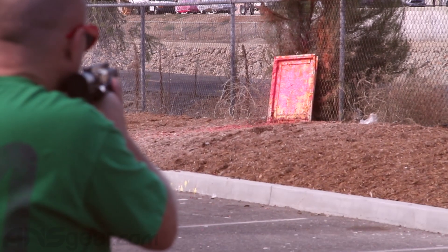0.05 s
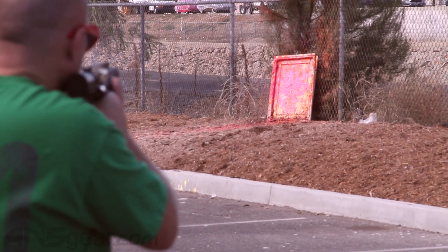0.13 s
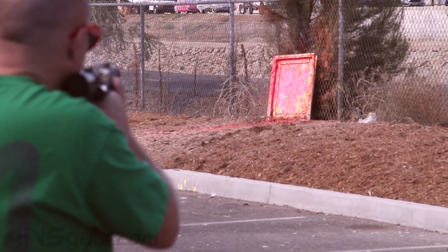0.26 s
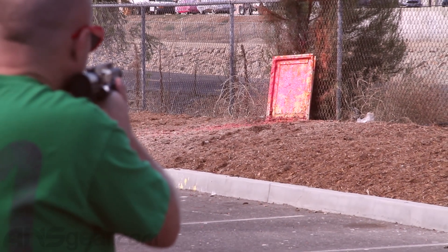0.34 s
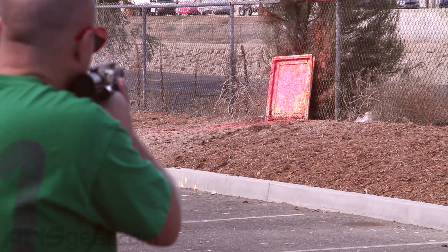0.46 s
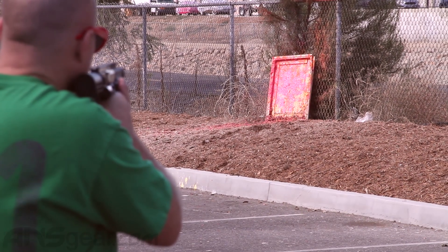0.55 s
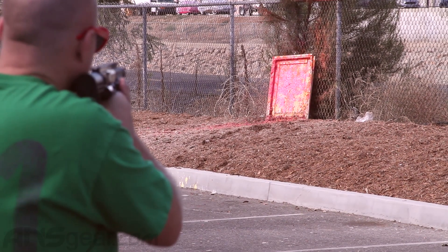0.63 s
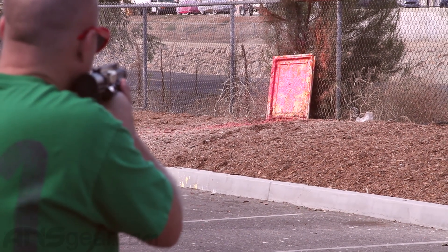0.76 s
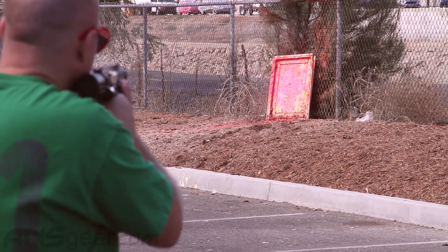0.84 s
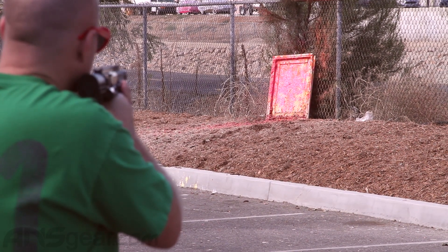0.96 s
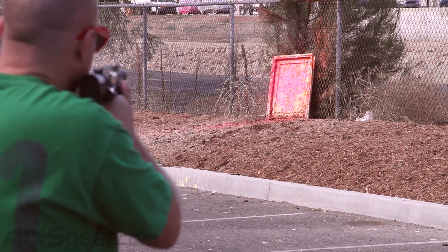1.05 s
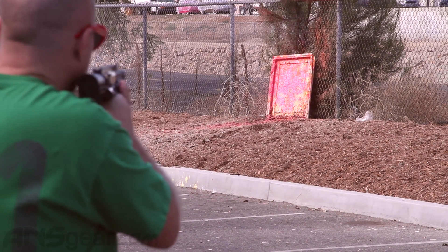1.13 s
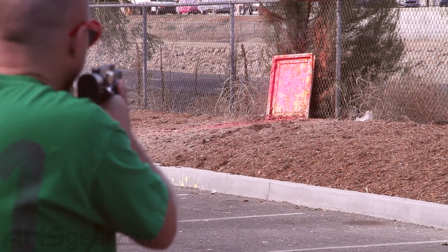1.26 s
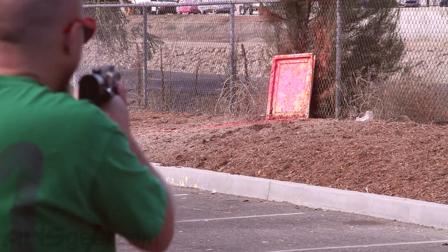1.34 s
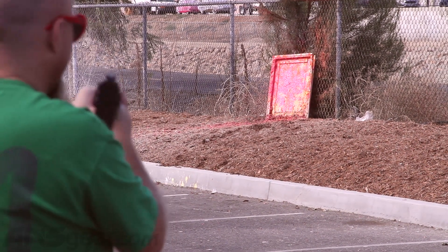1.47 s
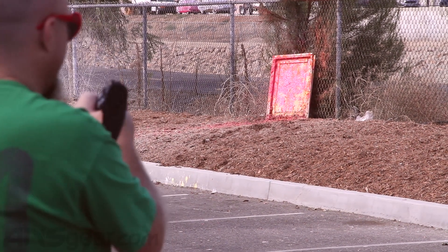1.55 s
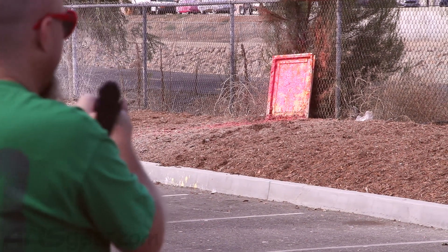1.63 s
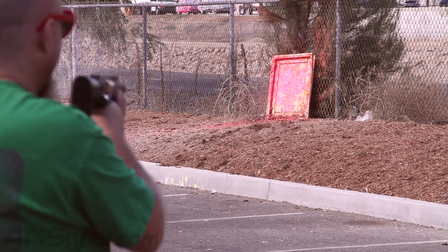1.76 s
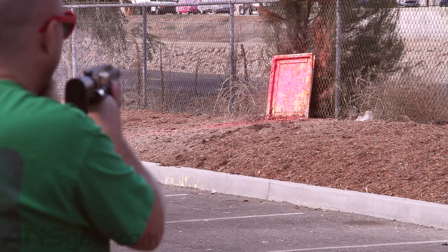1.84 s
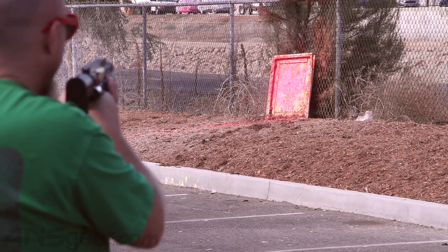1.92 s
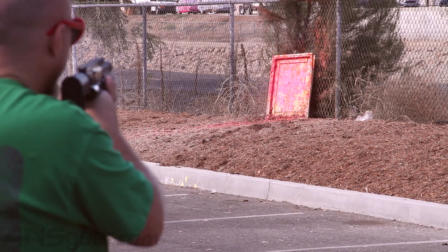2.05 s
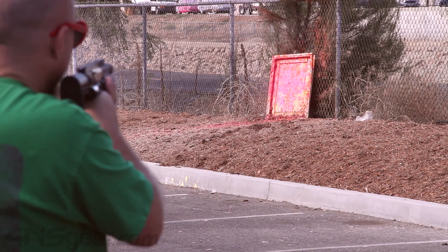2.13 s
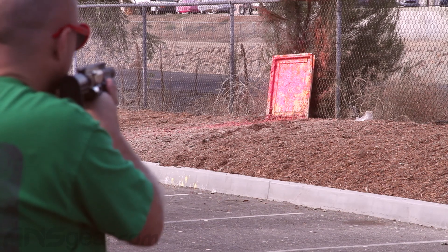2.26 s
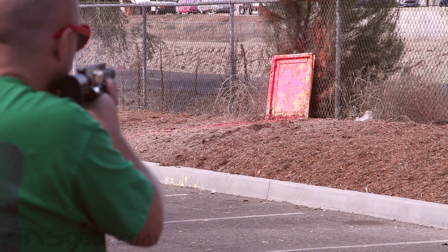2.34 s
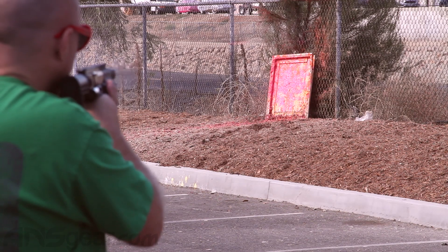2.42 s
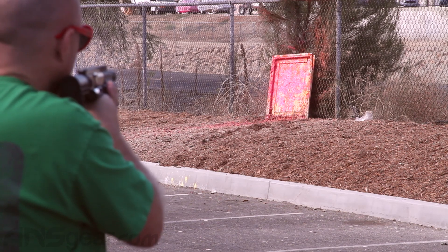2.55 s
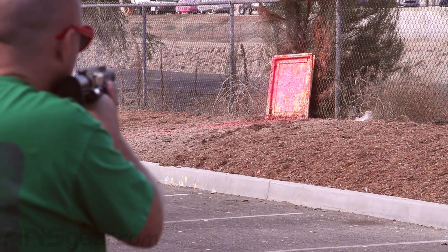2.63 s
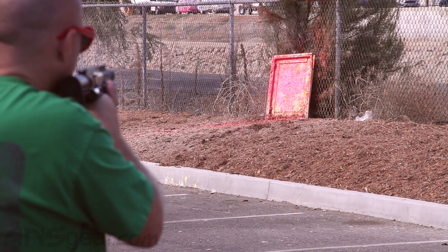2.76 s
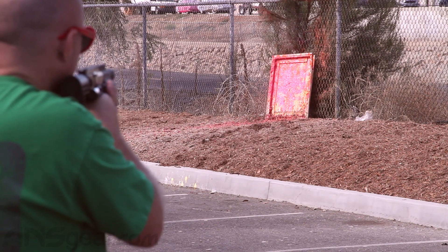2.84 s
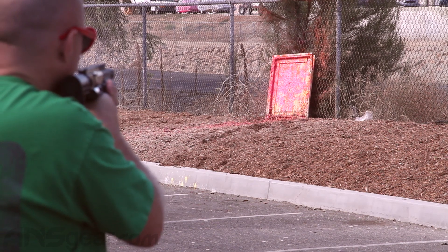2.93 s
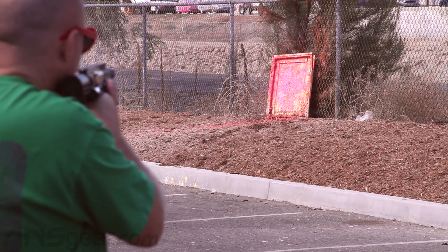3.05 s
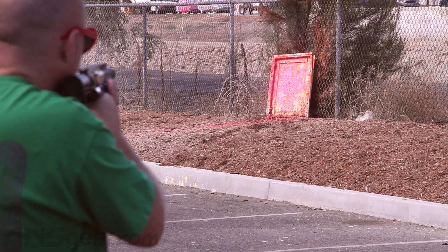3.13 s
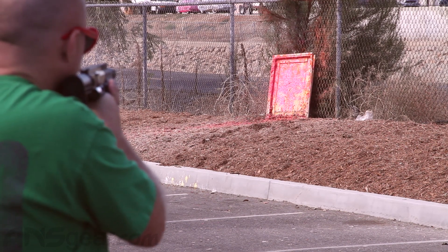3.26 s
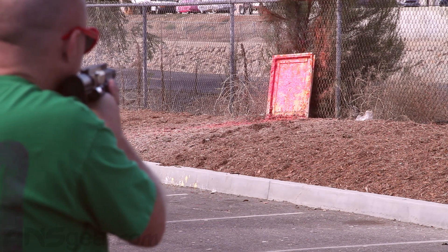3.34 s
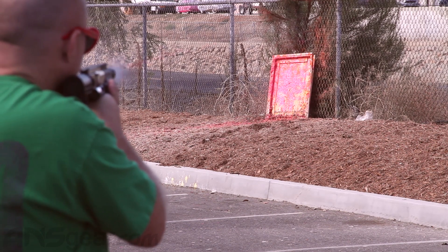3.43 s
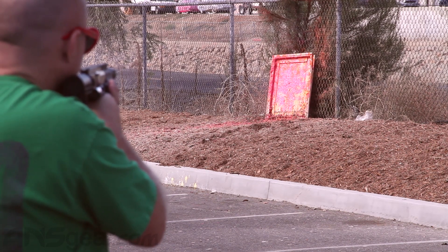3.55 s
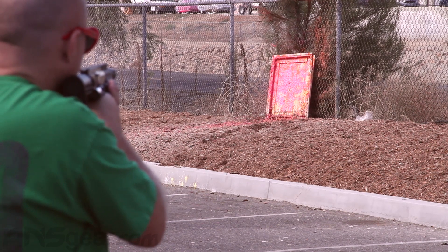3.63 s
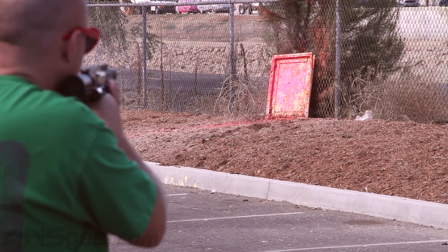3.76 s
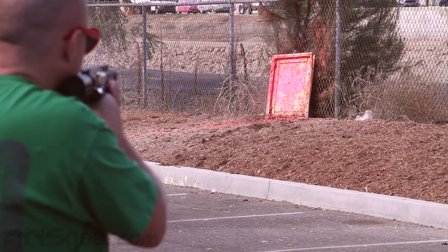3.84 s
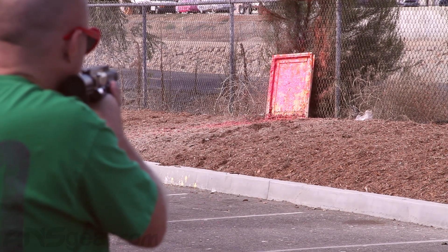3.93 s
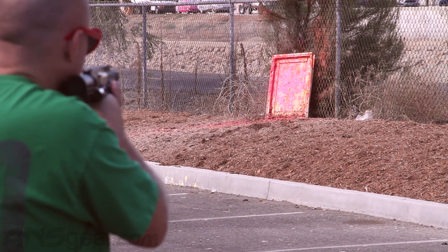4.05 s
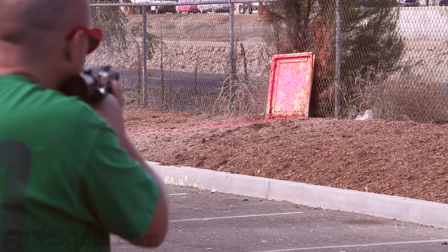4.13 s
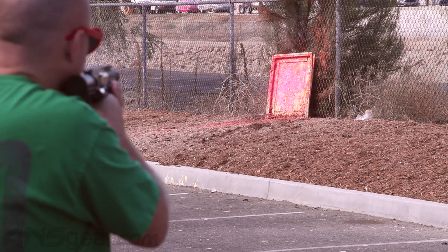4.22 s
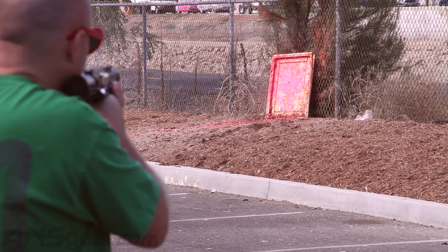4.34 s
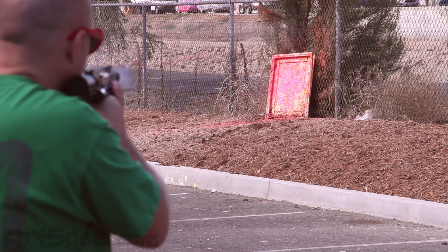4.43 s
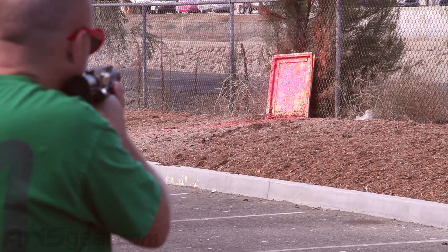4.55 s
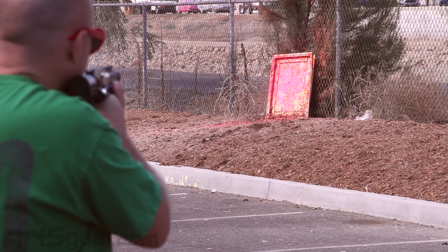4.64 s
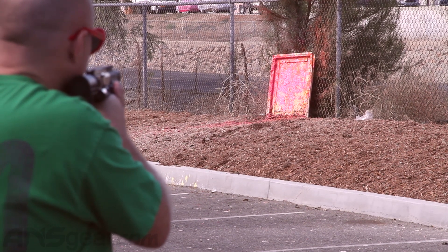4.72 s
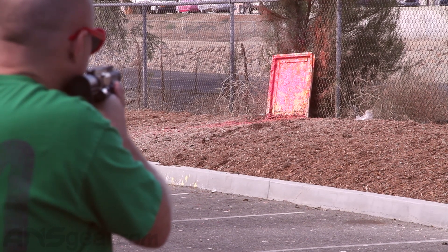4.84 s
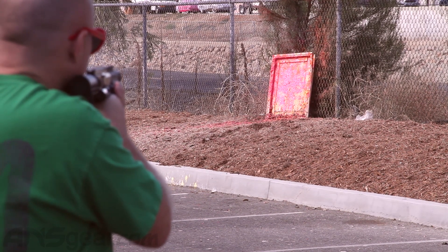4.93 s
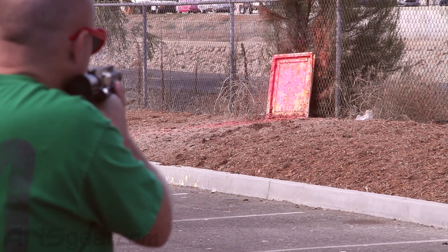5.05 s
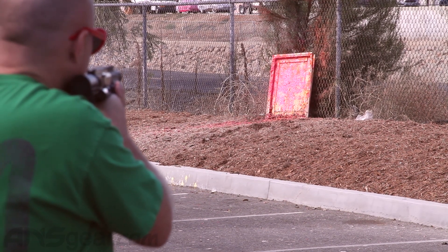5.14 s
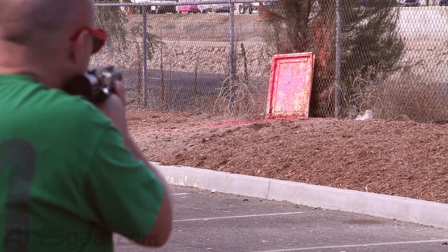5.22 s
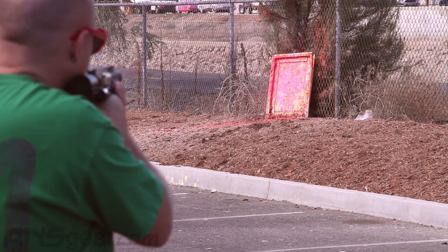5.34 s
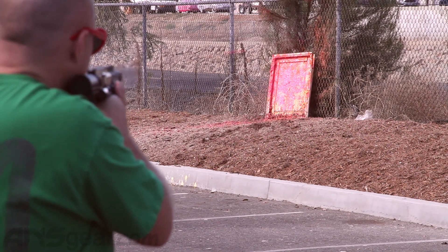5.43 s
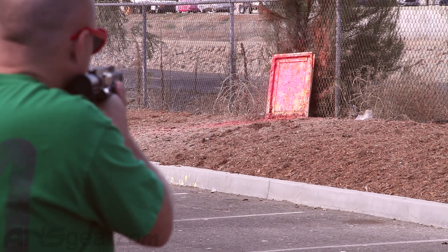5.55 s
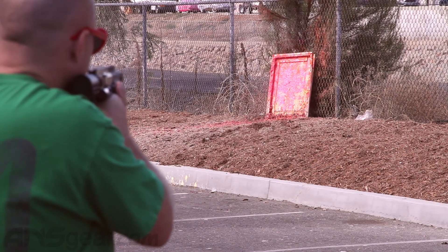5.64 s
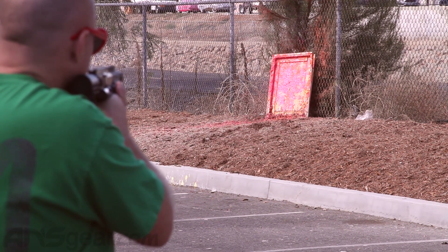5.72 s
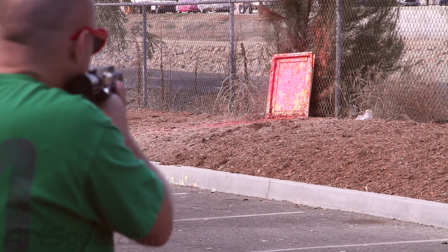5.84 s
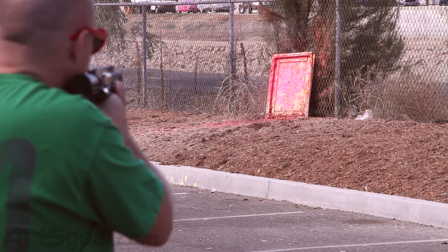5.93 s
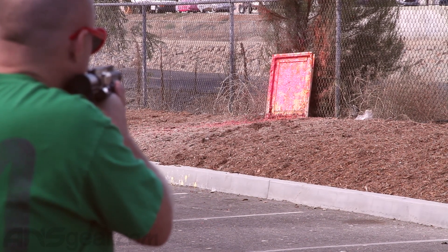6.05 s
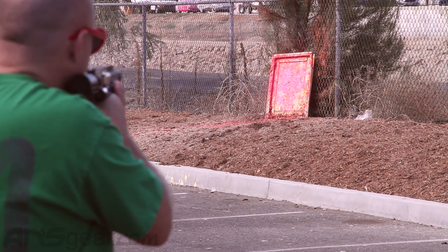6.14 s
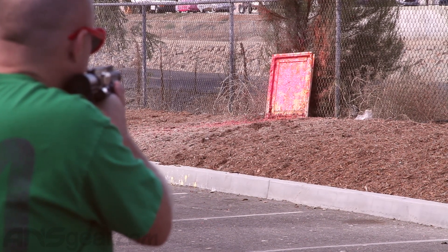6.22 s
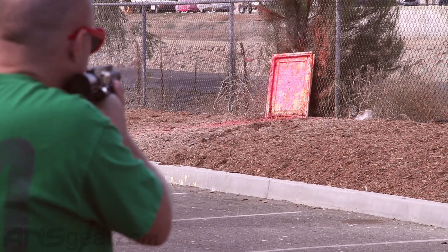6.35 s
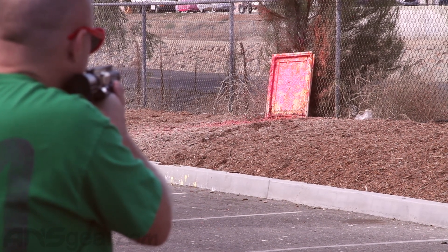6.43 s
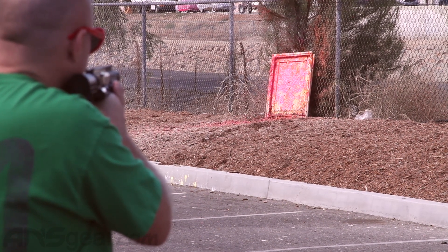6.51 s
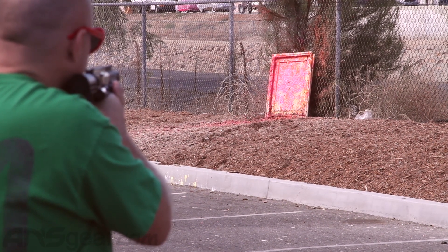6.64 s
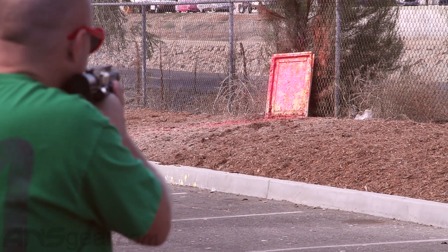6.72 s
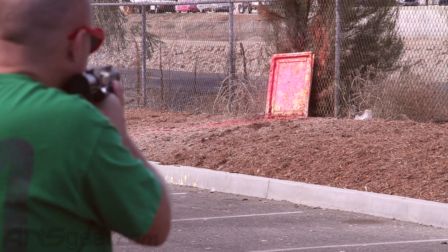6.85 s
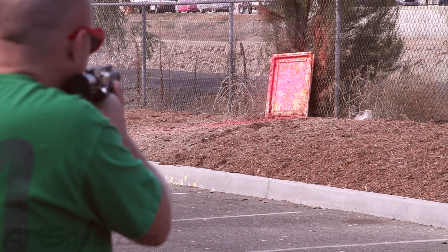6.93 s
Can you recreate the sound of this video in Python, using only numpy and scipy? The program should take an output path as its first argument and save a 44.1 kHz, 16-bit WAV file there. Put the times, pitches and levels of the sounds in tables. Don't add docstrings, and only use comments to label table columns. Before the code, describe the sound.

Very close outdoor pickup of a gas paintball gun. Wind rumbles over faint traffic while small metal clicks and dull taps build to two hard clacks. Then five single shots come about a second apart, overloading the microphone: sharp crack, gas burst, bolt rattle, a softer trigger click, and a small dry splat from a board farther off with short echoes.

```python
import sys
import numpy as np
from scipy import signal
from scipy.fft import rfft, irfft
from scipy.io import wavfile
from scipy.ndimage import uniform_filter1d

SR = 44100
rng = np.random.default_rng(int(sys.argv[2]) if len(sys.argv) > 2 else 0)


def linear_from_db(decibels):
    return 10 ** (np.asarray(decibels, float) / 20)


def generate_wav(signal):
    frames = np.transpose(np.atleast_2d(signal))
    scaled = np.clip(frames, -1, 1) * 32767
    pcm = np.round(scaled).astype(np.int16)
    wavfile.write(sys.argv[1], SR, pcm)


N = 307818

# time in seconds, level in dB.
WIND_STRENGTH = [(0.0, -39.5), (0.68, -42), (0.99, -38.5), (1.46, -40.5), (1.65, -36.5), (2.39, -35.5),
                 (2.55, -36.5), (3.05, -42), (3.6, -37.5), (4.26, -39.5), (4.59, -31.5), (4.9, -37.5),
                 (5.5, -35), (5.89, -36), (6.16, -33), (6.45, -33), (6.9, -37), (6.98, -44)]
# centre in seconds, lift in dB, half length in seconds.
SHORT_GUSTS = [(0.295, 6, 0.031), (2.315, 6.5, .05), (4.081, 4, 0.057), (4.265, 5.5, 0.037),
               (5.11, 2.5, 0.038), (5.528, 4, 0.021), (5.6, 6.5, .03), (5.77, 4, .04), (5.963, 6.5, 0.05),
               (6.046, 4, 0.019), (6.083, 7.5, 0.017), (6.245, 6, 0.012)]
# frequency in Hz, density in dB per Hz.
WIND_SPECTRUM = [(8.8, -24), (15, -1), (76, 1), (129, -6), (258, -18.5), (285, -21), (353, -25.5),
                 (390, -29.5), (450, -29.5), (580, -46.5), (990, -120)]
# frequency in Hz, density in dB per Hz.
BUFFET_SPECTRUM = [(90, -25), (160, 2.5), (300, -6), (520, -13.5), (800, -41.5)]
# time in seconds, level in dB.
TRAFFIC_LEVEL = [(0, -51), (1.3, -49), (1.6, -52), (2.4, -49), (3.7, -51), (4.4, -48.5), (5.2, -48.5),
                 (5.5, -50.5), (6.98, -51.5)]
# frequency in Hz, density in dB per Hz.
TRAFFIC_SPECTRUM = [(180, -31.5), (300, -13), (573, -2.5), (800, -0.5), (1130, 2), (1620, -6),
                    (2290, -18.5), (3770, -27), (4800, -34), (7300, -37.5), (9400, -35.5), (11000, -42.5),
                    (13000, -48), (15800, -47.5), (16500, -72.5)]
# peak in seconds, level in dB, rise and fall over 20 dB, both in seconds.
CLOTH_MOVES = [(.05, -82, .2, 0.22), (.25, -61, 0.23, 0.12), (.87, -72, .3, .06), (1.04, -70, .1, 0.1),
               (1.3, -68, .2, .05), (1.41, -66, .02, .25), (1.49, -43, 0.033, 0.054),
               (1.77, -62, 0.059, 0.06), (1.87, -68, .09, 0.16), (2.1, -76, 0.54, 1),
               (2.82, -67, 0.22, 0.29)]
# frequency in Hz, density in dB per Hz.
CLOTH_SPECTRUM = [(2000, -22.5), (3500, -10.5), (6500, -7), (8000, -3), (9300, 6.5), (10500, 0),
                  (12000, -10), (15700, -14), (17500, -39)]
# time in seconds, pitch in Hz, level in dB.
BIRD_CALL = [
    (4.085, 5400, -120),
    (4.1, 5420, -76),
    (4.116, 5350, -70),
    (4.135, 5050, -62),
    (4.15, 4600, -67),
    (4.17, 4000, -72),
    (4.2, 3450, -77),
    (4.205, 3400, -120),
]
# start in seconds, peak level in dB, pitch in Hz.
DRY_CRACKLES = [(.35, -66, 8800), (2.7253, -57, 9500), (2.7527, -49, 9800), (2.7625, -57, 9600),
                (2.7795, -55, 10000), (2.7961, -60, 10000), (2.8214, -63, 9500), (2.8284, -54, 9900),
                (2.8824, -57, 10300), (2.904, -62, 9900), (2.9567, -52, 10100), (2.9674, -63, 9810),
                (2.9744, -63, 10000), (3.8465, -37.5, 5300), (3.878, -48.5, 5300), (3.913, -56, 9400),
                (4.892, -50, 9800), (4.907, -55, 7500), (4.927, -48.5, 5600), (4.93, -48, 7000),
                (4.934, -48, 5900), (5.85, -56, 9600), (5.87, -59, 6000), (5.889, -55, 5500),
                (6.011, -57, 7800), (6.021, -53, 7170), (6.089, -57.5, 8040), (6.733, -52, 9500),
                (6.774, -56, 5410)]

# start in seconds, treble peak in dB,
# knock and clack in dB over the treble, spray in dB.
BURSTS = [
    (2.8068, -33, -13, -9, -71),
    (3.846, -33.5, -6, -8, -62.5),
    (4.839, -31, 4, 9.5, -49.5),
    (5.7999, -40, 12.5, 3, -54.5),
    (6.684, -35, 8.5, -14, -53),
]
# delay in seconds, treble in dB, knock in dB.
BURST_ECHOES = [
    (0, 0, 0),
    (.014, -18, -24),
    (.025, -28, -17),
    (.0312, -22, -11),
    (.056, -36, -23),
]
# time in seconds, level in dB.
SPRAY_CURVE = [(0, 18.5), (.012, -11), (.04, -1.5), (.075, -1), (.1, -6), (.15, -13), (.22, -18),
               (.3, -27.5)]
# frequency in Hz, density in dB per Hz.
SPRAY_SPECTRUM = [(900, -8), (1800, 9), (4000, -6.5), (6500, -5), (8000, -6), (9300, 5), (10500, -12),
                  (12000, -15), (14000, -23), (16000, -31.5)]
# frequency in Hz, width in Hz, level in dB.
BOARD_MODES = [(580, 170, 10), (373, 170, -10)]
# frequency in Hz, width in Hz, level in dB.
PANEL_MODES = [(2750, 270, -7), (1920, 1000, -6), (5300, 500, -19), (6740, 500, -24)]

# start in seconds, treble peak in dB,
# knock and clack in dB over the treble, T60 in seconds.
HANDLING_CLICKS = [(.0271, -43.5, -3, -12.5, 0.011), (.2449, -44.5, 6.5, 9.5, 0.017),
                   (.498, -39, -0.5, -8, 0.014), (.7299, -41.5, 6.5, 4, 0.03),
                   (.7344, -37.5, -21, 6, 0.0084), (.8493, -37.5, 5.5, -10, 0.022),
                   (.9935, -34.5, 3, 3.5, 0.017), (1.078, -35.5, 6.5, -5, 0.012),
                   (1.0886, -52, 12.5, -7, 0.022), (1.181, -46.5, 6, 5, 0.021),
                   (1.203, -25, -5.5, -5, 0.011), (1.273, -45, 8, -17, 0.01), (1.276, -35, 6, -5, 0.014),
                   (1.2889, -41, 7, -33, 0.0075), (1.3529, -13, -10.5, -9.5, 0.012),
                   (1.3635, -26, -6, 1.5, 0.031), (1.3906, -13.5, -7.5, -12.5, 0.0088),
                   (1.3968, -21, -15, -9, 0.0093), (1.5446, -42, -16, 0, 0.0091)]
# start in seconds, treble peak in dB, clack in dB over it.
GRIP_TAPS = [(.1094, -83, -14), (0.1615, -71, -8), (.176, -73, 18), (0.435, -69, -15), (0.4847, -65, -5),
             (0.5068, -69, -22), (0.692, -65, 19), (0.698, -61.5, 8), (.81, -70, 10), (0.965, -64, 21),
             (0.819, -57.5, -10), (0.8421, -53, 1), (0.969, -53.5, -17), (1.052, -57, -13),
             (1.072, -53, -4), (2.741, -63, -6.5), (3.0268, -60, -16), (3.0607, -65.5, -18.5),
             (4.082, -65.5, -4), (5.3062, -62.5, -6), (6.0262, -63, 0), (6.917, -66, 10)]
# start in seconds, treble peak in dB.
LOOSE_TICKS = [(.0144, -53), (.0654, -59), (.2234, -43.5), (.7173, -43), (.9844, -41), (1.195, -47),
               (1.7862, -54), (2.8744, -54), (3.7984, -50), (4.6349, -47), (6.48, -49.5)]
# start in seconds, treble peak in dB.
FINGER_TOUCHES = [(1.253, -53.5), (4.418, -47), (4.786, -57), (5.3478, -52), (5.368, -42), (5.5892, -60.5),
                  (5.741, -54.5), (6.257, -43), (6.6319, -48.5), (6.8944, -64)]
# frequency in Hz, density in dB per Hz.
TICK_SPECTRUM = [(2900, -47), (5000, -20.5), (6000, -7), (7100, 0), (8800, 8.5), (9800, 11), (10500, -3),
                 (12000, -3), (13500, -14.5), (15700, -23.5), (17500, -46)]
# frequency in Hz, width in Hz, level in dB.
KNOCK_MODES = [(1180, 160, 8), (1550, 360, 11)]
# frequency in Hz, width in Hz, level in dB.
CLACK_MODES = [(3090, 340, -1), (2600, 670, -6.5), (4760, 600, -14)]
# frequency in Hz, width in Hz, level in dB.
SHEEN_MODES = [(6240, 100, -12), (6990, 180, -18), (7500, 380, -1), (8700, 430, 0), (9200, 160, -1.5)]
# start in seconds, frequency in Hz, level in dB, T60 in seconds.
LEFT_RINGING = [(.246, 3300, -45, .03), (.247, 3230, -58, .16), (.247, 4930, -64, .12),
                (.247, 7700, -60, .08), (.247, 4700, -68, .12), (.5, 7600, -56, .04), (.734, 3170, -63, .1),
                (.735, 7700, -58, .1), (.735, 4700, -62, .08), (.735, 6300, -66, .12),
                (.996, 7740, -53, .14), (.996, 3750, -60, .09), (.996, 3300, -57, .1),
                (.996, 4700, -58, .08), (1.08, 2724, -64, .15), (1.08, 3865, -66, .2),
                (1.205, 7740, -53, .14), (1.205, 5800, -57, .1), (1.205, 3200, -61, .1),
                (1.36, 7467, -52, .08), (1.394, 2864, -59, .2), (1.394, 3844, -62, .22),
                (1.394, 4231, -62, .1), (1.394, 5238, -66, .3), (1.394, 7628, -62, .14),
                (2.378, 7800, -51, .06), (2.416, 3750, -15, .034), (2.484, 3250, -30, .04),
                (2.586, 590, -40, .04), (2.59, 2640, -60, .5), (2.59, 3860, -62, .4),
                (3.618, 3838, -58, .66), (3.618, 6315, -65, .5), (5.376, 5300, -53, .15),
                (6.265, 11000, -43, .04), (6.43, 1190, -46, .5)]

# start in seconds, treble peak in dB.
SEAR_CLICKS = [
    (2.3763, -30),
    (3.433, -27.5),
    (4.4225, -28.5),
    (5.374, -31),
    (6.2637, -30.5),
]
# start in seconds, level in dB.
TRIGGER_RELEASES = [
    (2.5544, -21),
    (3.5829, -21),
    (4.5643, -21.5),
    (5.5135, -20.5),
    (6.3908, -24),
]
# start in seconds, level in dB.
TRIGGER_RESETS = [
    (2.5845, -12.5),
    (3.6132, -13.5),
    (4.596, -12),
    (5.5482, -10.5),
    (6.424, -10.5),
]
# start in seconds, treble peak in dB.
TRIGGER_REBOUNDS = [(2.5945, -31.5), (2.5975, -34.5), (3.622, -28), (4.6042, -26), (5.5575, -29),
                    (5.563, -38), (6.4325, -27.5)]
# frequency in Hz, width in Hz, level in dB.
TRIGGER_MODES = [(1200, 210, -0.5), (1670, 230, -3.5), (2300, 490, -12.5), (3270, 170, -1),
                 (4900, 420, -14), (6000, 300, -9), (6700, 280, -16), (7980, 300, -3.5), (8800, 330, 1.5),
                 (9440, 120, -5.5), (11500, 530, -17.5), (12600, 430, -17), (15300, 500, -37.5)]
# frequency in Hz, level in dB, T60 in seconds.
SHAKEN_SPRINGS = [(1965, 0, .15), (2593, -3, 0.2), (3160, -3.5, .2), (3838, -7, 0.53), (4140, -7, .25),
                  (4762, -7, .22), (5235, -2.5, .2), (5760, -6, .18), (7354, -9, .3), (7630, -11, .3),
                  (8355, -10, .3), (8800, -7.5, .35)]
# start in seconds, treble peak in dB.
BOLT_SLAMS = [
    (2.425, -20.5),
    (3.48, -18),
    (4.471, -22),
    (5.425, -21),
    (6.315, -17),
]
# start in seconds, knock peak in dB, clack in dB over it, T60 in seconds.
BOLT_BOUNCES = [(2.424, -6.5, 1.5, 0.036), (2.453, -7.5, -4, 0.036), (2.432, -12, -12.5, .02),
                (2.471, -18, -20, 0.048), (2.477, -29, -14, 0.036), (2.485, -20, -14, 0.06),
                (2.492, -32, -8, .02), (3.482, -9.5, 0.5, 0.03), (3.491, -24.5, -6, 0.024),
                (3.508, -7, -4.5, 0.053), (3.525, -14, -14, 0.066), (3.537, -27, -16, 0.034),
                (4.471, -1.5, -4.5, 0.02), (4.4962, -4, -3, 0.059), (4.513, -9.5, -19, 0.049),
                (4.523, -18, -16, 0.037), (4.486, -16, -7.5, 0.023), (5.4246, 0.5, -4, 0.02),
                (5.447, -4, -14, 0.028), (5.457, -10, -17, 0.11), (5.45, -18, -6, .02),
                (5.478, -24, -2, 0.033), (6.358, -29, -5, .03), (6.315, -3.5, 3, 0.056),
                (6.337, -2, -9, 0.066), (6.343, -6.5, -9, 0.061)]

# start in seconds, jet in dB, breech tone in dB, breech shut after seconds.
GUN_SHOTS = [
    (2.4002, -3, -16, .031),
    (3.4562, -2.5, -14, .041),
    (4.4462, -2.5, -20, .026),
    (5.4002, -2.5, -20, .024),
    (6.2906, -3, -22, .024),
]
# start in seconds from the blast, level in dB, hold in seconds, fall in dB per second.
GAS_STAGES = [
    (-.0064, -20, .0005, 2199),
    (-.0034, -16.5, .0035, 2999),
    (.0002, 3.5, 0.0084, 1700),
    (.004, -22, .035, 329.5),
    (.005, -44, 0.062, 102),
]
# start in seconds from the blast, level in dB, hold in seconds,
# fall in dB per second.
SHAKE_STAGES = [
    (-.0064, -24, 0.00046, 1792),
    (-.0034, -19.5, .0035, 3008),
    (.0002, 1, 0.0086, 1493),
    (.004, -23.5, 0.025, 272),
    (.005, -47, 0.063, 89.8),
]
# frequency in Hz, density in dB per Hz.
GAS_SPECTRUM = [(2000, -37), (3500, 1.5), (5200, -3), (6500, -6.5), (7800, -2.5), (8800, 6.5), (10300, 0),
                (11300, -13), (12400, -18.5), (13200, -21), (15700, -23.5), (17500, -38.5)]
# frequency in Hz, density in dB per Hz.
LAST_GAS_SPECTRUM = [(9500, -31), (10600, -1), (12300, -2), (13300, -12), (15700, -12.5), (16500, -40)]
# frequency in Hz, density in dB per Hz.
SHAKE_SPECTRUM = [(88, -33.5), (150, -7), (237, -12), (400, -4), (556, 0.5), (876, 0.5), (1150, 1),
                  (1590, 6.5), (3240, -4.5), (4500, -21.5), (5850, -36), (9900, -120)]
# frequency in Hz, width in Hz, level in dB.
SHELL_MODES = [(1160, 80, 2.5), (1480, 200, -3), (1880, 200, -3.5), (3170, 320, -7.5)]
# frequency in Hz, level in dB, T60 in seconds.
BARREL_RINGS = [(750, -24.5, 0.063), (2344, -25, 0.19), (3350, -29, 0.16), (4950, -35.5, 0.22),
                (5700, -33.5, 0.23), (7700, -30.5, .2), (8750, -26.5, 0.28), (9800, -24, 0.21)]

SEAR_COLOUR, RESET_COLOUR = (.7, -7.5), (0, -4.5)


def evened(x):
    return x / np.sqrt(np.mean(x ** 2) + 1e-20)


def peaked(x):
    return x / np.sqrt(uniform_filter1d(x ** 2, size=66).max())


def add(mix, s, sound):
    part = mix[round(s * SR):][:len(sound)]
    part += sound[:len(part)]


def dulled(x, hz):
    return signal.sosfilt(signal.butter(4, hz, fs=SR, output="sos"), x)


def thinned(x, hz, order):
    return signal.lfilter(*signal.butter(order, hz, "high", fs=SR), x)


def coloured(points, count):
    f, level = np.transpose(points)
    hz = np.fft.rfftfreq(count, 1 / SR)
    shape = linear_from_db(np.interp(np.log(hz + 1), np.log(f + 1), level, -120, -120))
    return evened(irfft(rfft(rng.standard_normal(count)) * shape, count))


def resonant(x, modes):
    out = 0
    for hz, width, level_db in modes:
        r = np.exp(-np.pi * width / SR)
        poles = [1, -2 * r * np.cos(2 * np.pi * hz / SR), r * r]
        out = out + linear_from_db(level_db) * (1 - r) * signal.lfilter([1, 0, -1], poles, x)
    return out


def drift(hz):
    return evened(signal.lfilter(*signal.butter(2, hz, fs=SR), rng.standard_normal(N)))


def unsteady(count, size):
    return evened(uniform_filter1d(rng.standard_normal(count), size=size))


def along(rows, column=1):
    rows = np.transpose(rows)
    return np.interp(np.arange(N) / SR, rows[0], rows[column])


def wind():
    t = np.arange(N) / SR
    rumble = coloured(WIND_SPECTRUM, N) * linear_from_db(1.1 * drift(6.3))
    rumble /= np.sqrt(uniform_filter1d(uniform_filter1d(rumble ** 2, size=9000), size=9000))
    strength_db = along(WIND_STRENGTH)
    strength_db = strength_db + sum(db * np.exp(-((t - s) / half) ** 2) for s, db, half in SHORT_GUSTS)
    buffet_db = -53.5 + 2.1 * (strength_db + 34) + 2.5 * drift(12)
    return rumble * linear_from_db(strength_db - 0.5) + coloured(BUFFET_SPECTRUM, N) * linear_from_db(buffet_db)


def traffic():
    return coloured(TRAFFIC_SPECTRUM, N) * linear_from_db(along(TRAFFIC_LEVEL) - 0.07 + 0.2 * drift(9.2))


def cloth():
    t = np.arange(N) / SR
    rubbing = evened(coloured(CLOTH_SPECTRUM, N) * linear_from_db(2.3 * drift(90)))
    moves = 0
    for s, db, rise, fall in CLOTH_MOVES:
        moves = moves + linear_from_db(db - 20 * np.maximum((s - t) / rise, (t - s) / fall))
    return rubbing * moves


def bird():
    hz = along(BIRD_CALL, column=1)
    turn = 2 * np.pi * np.cumsum(hz) / SR
    octave = linear_from_db(-1) * np.exp(-((2 * hz - 9800) / 1300) ** 2)
    level = linear_from_db(along(BIRD_CALL, column=2) + 0.5 + 2.5 * drift(120))
    call = level * (np.sin(turn) + octave * np.sin(2 * turn))
    echo = dulled(call, 6000)
    return call + linear_from_db(-7) * np.roll(echo, 1100) + linear_from_db(-13) * np.roll(echo, 4500)


def crackle(level_db, hz):
    t = np.arange(400) / SR
    grain = rng.standard_normal(len(t)) * linear_from_db(-60 * t / .004)
    heard = resonant(grain, [(hz, 900, 0), (11800, 1500, -14)])
    return linear_from_db(level_db - 4.5) * peaked(dulled(heard, 12500))


def click(treble_db, knock_db, clack_db, t60, rise=.0009, upper=CLACK_MODES, top_hz=5500, sheen_db=-4.5):
    t = np.arange(2048) / SR
    start = 1 - np.exp(-(t / rise) ** 2)
    linger = linear_from_db(-25 - 60 * t / .04)
    strike = rng.standard_normal(len(t)) * start * (linear_from_db(-60 * t / (1.1 * t60)) + linger)
    shake = dulled(strike, top_hz)
    parts = peaked(coloured(TICK_SPECTRUM, len(t)) * start * (linear_from_db(-60 * t / t60) + linger))
    sheen = peaked(dulled(resonant(strike, SHEEN_MODES), 11000))
    parts = peaked(parts + linear_from_db(sheen_db) * sheen)
    knock = sum(linear_from_db(db - 8) * peaked(resonant(shake, [(hz, width, 0)])) for hz, width, db in KNOCK_MODES)
    parts += linear_from_db(knock_db - 3) * knock
    parts += linear_from_db(clack_db) * peaked(resonant(shake, upper))
    return linear_from_db(treble_db) * thinned(parts, 900, 4)


def splat(treble_db, knock_db, clack_db, spray_db):
    t = np.arange(13000) / SR
    patter_db = 2.8 * unsteady(len(t), 250)
    spray_curve_db = np.interp(t, *np.transpose(SPRAY_CURVE))
    out = coloured(SPRAY_SPECTRUM, len(t)) * linear_from_db(spray_db + patter_db + spray_curve_db)
    out += linear_from_db(treble_db + knock_db - 3.5) * peaked(resonant(1. * (t == 0), BOARD_MODES))
    for delay, bright_db, body_db in BURST_ECHOES:
        lift_db = body_db - bright_db
        echo = click(treble_db + bright_db, knock_db + lift_db, clack_db + lift_db, .007,
                     rise=.0001, upper=PANEL_MODES, top_hz=4200, sheen_db=-30)
        add(out, delay, echo)
    return dulled(out, 15000)


def clicks():
    rows = HANDLING_CLICKS + [(s, db, 13, clack_db, .0087) for s, db, clack_db in GRIP_TAPS]
    kinds = [(LOOSE_TICKS, (-11, -14, .012)),
             (FINGER_TOUCHES, (2.3, -.7, .011)),
             (SEAR_CLICKS, (*SEAR_COLOUR, .007)),
             (BOLT_SLAMS, (-9.5, 6.4, .028)),
             (TRIGGER_REBOUNDS, (-5, 0, .018))]
    return rows + [(*row, *tone) for table, tone in kinds for row in table]


def ring(hz, level_db, t60):
    t = np.arange(12000) / SR
    waver = 1 + 0.44 * unsteady(len(t), 300)
    return linear_from_db(level_db - 60 * t / t60) * np.sin(2 * np.pi * hz * t) * waver


def springs(level_db):
    return sum(ring(hz, level_db + db + 2 * rng.standard_normal(), t60) for hz, db, t60 in SHAKEN_SPRINGS)


def snap(level_db, tilt_db=0):
    t = np.arange(2048) / SR
    start = 1 - np.exp(-(t / .0008) ** 2)
    linger = linear_from_db(-24.5 - 60 * t / .025)
    blow = start * (linear_from_db(-60 * np.maximum(t - .0014, 0) / .0078) + linger)
    strike = rng.standard_normal(len(t)) * blow
    modes = 0
    for hz, width, db in TRIGGER_MODES:
        modes = modes + linear_from_db(db + tilt_db * (hz > 5000)) * peaked(resonant(strike, [(hz, width, 0)]))
    hiss = peaked(coloured(TICK_SPECTRUM, len(t)) * blow)
    contact = dulled(modes, 11000) + linear_from_db(-7 + tilt_db) * hiss
    return linear_from_db(level_db) * peaked(thinned(contact, 900, 2))


def bounce(knock_db, clack_db, t60):
    t = np.arange(3000) / SR
    scrape = rng.standard_normal(len(t)) * (1 - np.exp(-(t / .0004) ** 2)) * linear_from_db(-60 * t / .006)
    blow = dulled(scrape + 6 * (t == 0), 4200)
    frame = peaked(resonant(blow, [(1178.5, 5.8 / t60, 0)]))
    frame = frame + linear_from_db(-6.5) * peaked(resonant(blow, [(1850, 340, 0)]))
    clack = peaked(resonant(resonant(blow, [(2850, 440, 1)]), [(2930, 350, 0)]))
    return linear_from_db(knock_db - 5.5) * thinned(frame + linear_from_db(clack_db - 3.5) * clack, 850, 3)


def staged(t, stages):
    power = 0
    for start, level_db, hold, fall in stages:
        rise = np.clip((t - start) / .00047, 0, 1)
        power = power + (rise * linear_from_db(level_db - fall * np.maximum(t - start - hold, 0))) ** 2
    return np.sqrt(power)


def breech(t, level_db, shut):
    s = np.clip(t, 0, shut)
    waver = unsteady(len(t), 200)
    hz = 493 * (1 + 300 * s ** 2) * (1 + 0.041 * waver)
    turn = 2 * np.pi * np.cumsum(hz) / SR
    tone = linear_from_db(-5.5 * s / shut) * np.sin(turn) + linear_from_db(-0.5) * (s / shut) * np.sin(2 * turn)
    opening = np.clip(t / .013, 0, 1)
    cut = np.exp(-np.maximum(t - shut, 0) / .0018)
    return linear_from_db(level_db + 2.7 * waver) * tone * opening * cut


def blast():
    t = np.arange(1500) / SR
    turn = 2 * np.pi * (455 * t + 2.2e8 * t ** 4)
    pipe = np.sin(turn) + .25 * np.sin(3 * turn)
    pipe = pipe * np.clip(.55 + t / .008, 0, 1) * np.exp(-(t / .0062) ** 4)
    crack = linear_from_db(5) * np.sin(2 * np.pi * 2750 * t) * np.exp(-((t - .0016) / .0011) ** 2)
    u = np.maximum(t - .0075, 0) / .0016
    ground = np.sin(np.pi * u) * np.exp(-(u / .75) ** 2)
    swing = linear_from_db(-12) * np.exp(-((t - .012) / .003) ** 2)
    swing = swing + linear_from_db(-10) * np.exp(-((t - .004) / .003) ** 2)
    return crack + swing - linear_from_db(9) * pipe - linear_from_db(16) * ground


def shot(jet_db, breech_db, shut):
    t = np.arange(22050) / SR - .01
    whistle = evened(resonant(rng.standard_normal(len(t)), [(9280, 340, 0)]))
    gas = coloured(GAS_SPECTRUM, len(t)) + linear_from_db(2.0) * whistle * np.exp(-((t - .008) / .009) ** 2)
    clatter = evened(uniform_filter1d(unsteady(len(t), 100), size=100)) * (t > .012)
    out = gas * linear_from_db(jet_db + 0.89 * clatter) * staged(t, GAS_STAGES)
    out += coloured(LAST_GAS_SPECTRUM, len(t)) * linear_from_db(jet_db - 13) * staged(t, GAS_STAGES[3:])
    out += coloured(SHAKE_SPECTRUM, len(t)) * linear_from_db(3.7 * clatter) * staged(t, SHAKE_STAGES)
    shell = evened(resonant(rng.standard_normal(len(t)), SHELL_MODES))
    out += linear_from_db(-5.5 + 2.4 * clatter) * shell * staged(t, SHAKE_STAGES[3:])
    add(out, .012, sum(ring(*mode) for mode in BARREL_RINGS))
    out += breech(t, breech_db, shut)
    add(out, .0098, blast())
    out -= linear_from_db(-2) * np.sin(2 * np.pi * 720 * t) * np.exp(-t / .009) * (t > 0)
    return out


def scene():
    mix = wind() + traffic() + cloth() + bird()
    for s, *row in DRY_CRACKLES:
        add(mix, s, crackle(*row))
    for s, *row in BURSTS:
        add(mix, s + .0004, splat(*row))
    for s, *row in clicks():
        add(mix, s - .0004, click(*row))
    for s, *row in LEFT_RINGING:
        add(mix, s, ring(*row))
    for s, db in SEAR_CLICKS:
        add(mix, s - .0094, click(db - 25.5, *SEAR_COLOUR, .12, rise=.0094))
    for s, db in TRIGGER_RELEASES:
        add(mix, s - .0004, snap(db + 5, tilt_db=-3))
    for s, db in TRIGGER_RESETS:
        add(mix, s - .0013, click(db - 17, *RESET_COLOUR, .027, rise=.0013))
        add(mix, s - .0002, snap(db + 2.5))
        add(mix, s + .0022, springs(db - 51))
    for s, *row in BOLT_BOUNCES:
        add(mix, s + .0006, bounce(*row))
    for s, *row in GUN_SHOTS:
        add(mix, s - .01, shot(*row))
    return mix[None]


def low_pass(x):
    return signal.sosfilt(signal.butter(12, 15900, fs=SR, output="sos"), x)


def record(dry):
    mix = np.clip(dry, -.99, .99)
    return low_pass(mix)


dry = scene()
out = record(dry)
generate_wav(out)
```